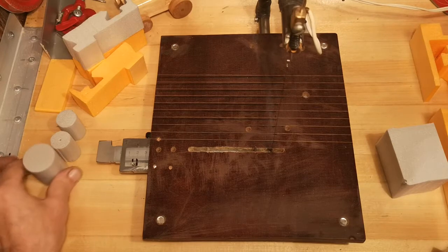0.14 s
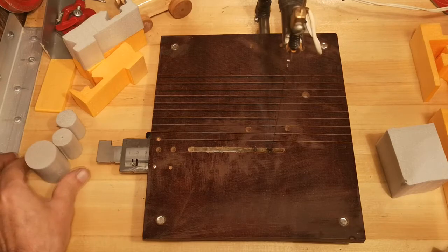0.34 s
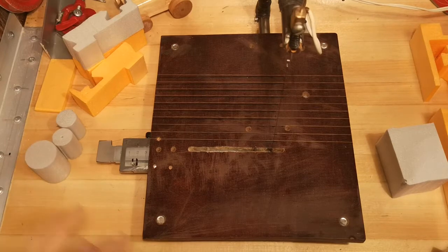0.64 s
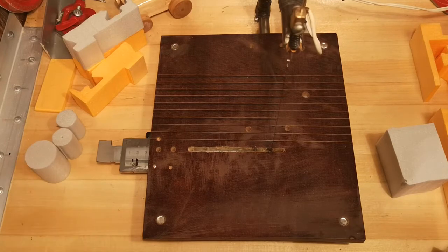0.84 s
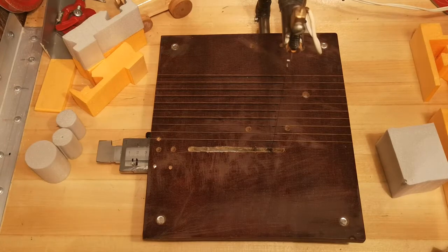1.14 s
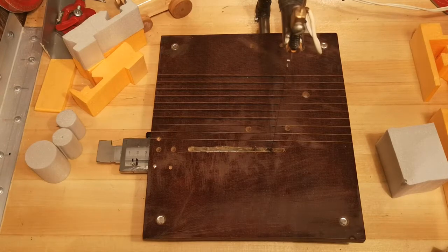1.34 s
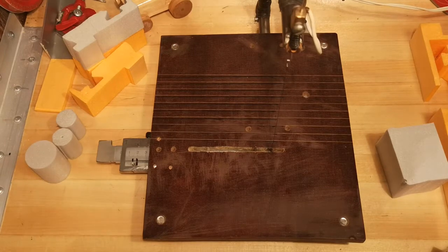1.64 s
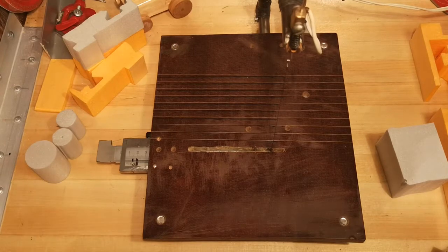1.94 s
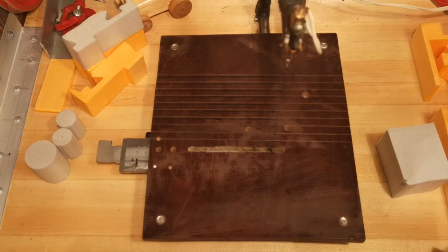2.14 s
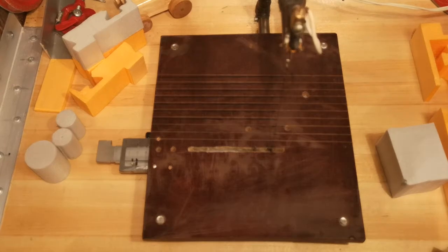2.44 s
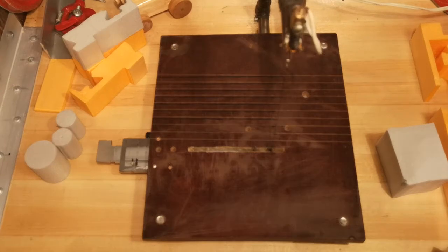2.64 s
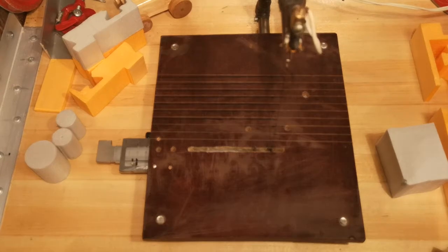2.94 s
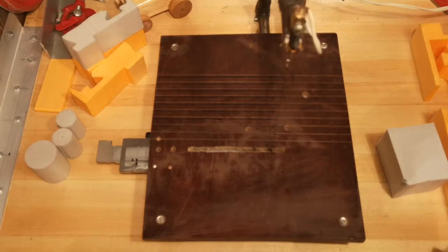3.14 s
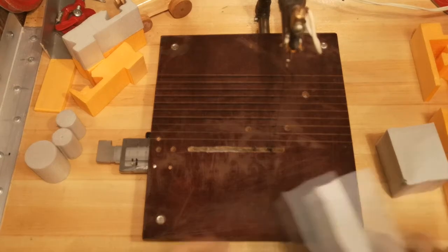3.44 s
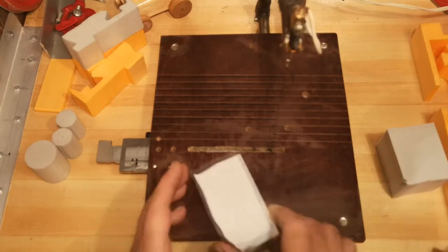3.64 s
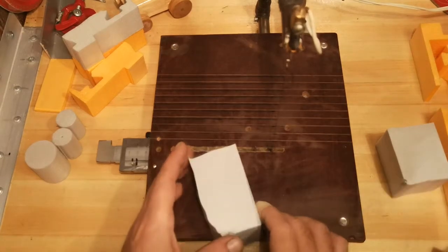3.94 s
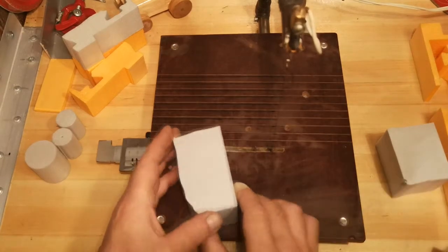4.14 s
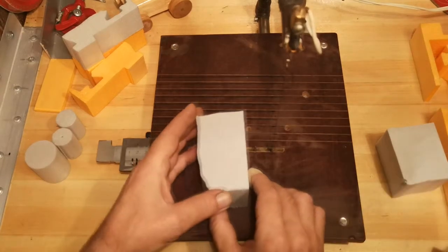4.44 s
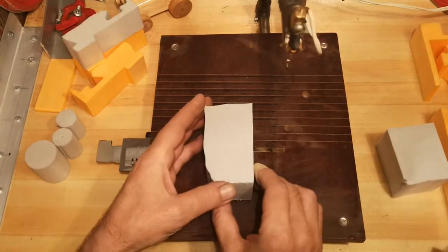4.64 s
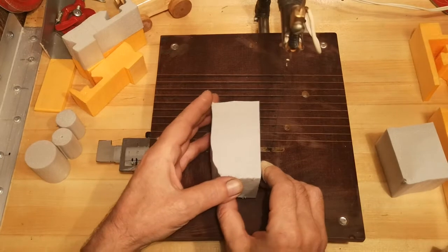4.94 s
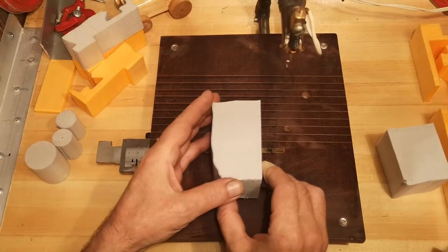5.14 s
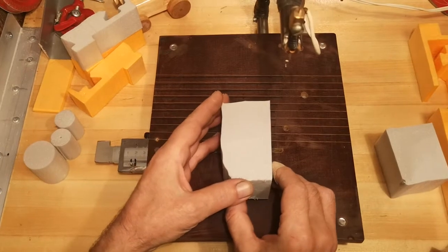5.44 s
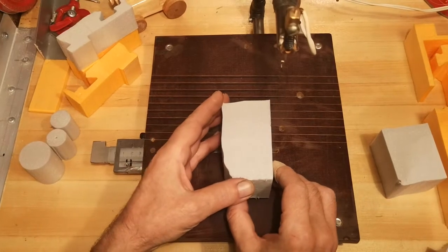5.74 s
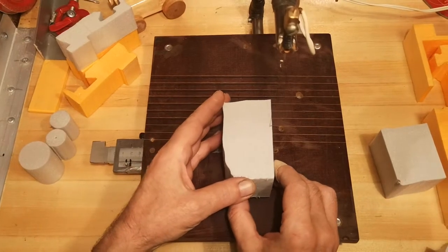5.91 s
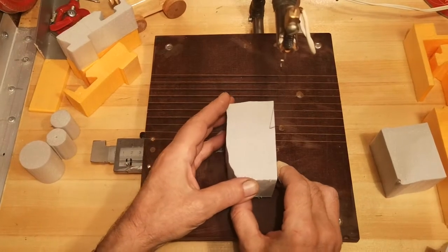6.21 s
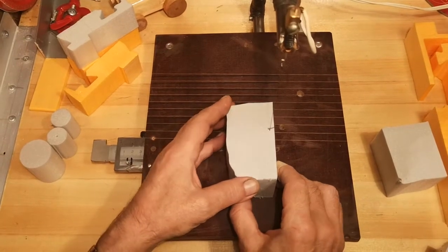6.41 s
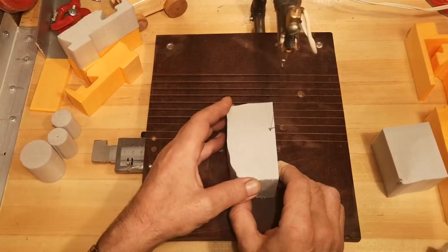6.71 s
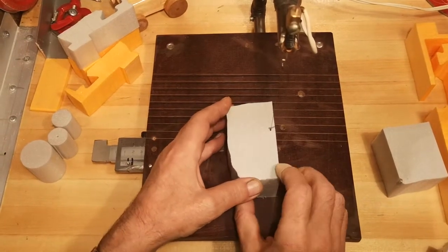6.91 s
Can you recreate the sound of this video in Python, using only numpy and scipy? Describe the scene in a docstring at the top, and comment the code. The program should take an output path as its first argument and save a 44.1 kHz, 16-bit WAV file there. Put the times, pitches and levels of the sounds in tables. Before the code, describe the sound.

A close stereo microphone hears foam handled on a workbench in a small room with very short reflections. Quiet low hum, airy room tone and soft swelling rumble run throughout. From 0 s, dry, hissy finger rubs on polystyrene begin, with a very sharp snap at 0.25 s. Light grainy rubs follow; at 1.06 s a crisp snap carries a tiny metallic clink, with fainter ones at 1.2 and 1.3 s. Around 1.55 s a block scrapes dully with a faint knock, then rubs swell near 1.8 s. Snappy rustles come at 2.45-2.6 s, then little until about 4.1 s. At 4.15-4.3 s a brief gritty scrape squeaks twice around 2 kHz over soft, low board thumps. A thin squeak follows at 4.56 s, another with a scrape at 5.22 s. Sparse bright scratches and small crackles continue, with a clearer snap at 6.6 s, then fade to near quiet by 7 s.

```python
"""Fingers rub polystyrene foam on a workbench: noise grains of bead clicks excite drifting resonances.
A block also scrapes on the board as coloured grain and squeaks as gliding tones of two harmonics.
Foam edges snap as noise bursts through damped resonances; a metal tool and the board ring as decaying modes.
All of these are reverberated by the workshop, over filtered-noise rumble, air, room tone and a hum of sines."""
import sys
import numpy as np
from scipy import signal
from scipy.fft import rfft, irfft, next_fast_len
from scipy.io import wavfile
from scipy.ndimage import uniform_filter1d

SR = 44100
rng = np.random.default_rng(int(sys.argv[2]) if len(sys.argv) > 2 else 0)


def transcribe(u):
    """Save the signal u as a 16-bit wav file named by the first command-line argument.

    u: samples, shape (n,) or (channels, n), limited to [-1, 1]; the rate is SR.
    q: integer samples, one column per channel.
    """
    v = np.clip(np.atleast_2d(u).T, -1, 1)
    q = np.round(v * 32767).astype(np.int16)
    wavfile.write(sys.argv[1], SR, q)


N = 311787
TIME = np.arange(N) / SR


# strokes of the fingers over the foam: start t/s, rise t/s, length t/s, hiss level/dB,
# body re hiss level/dB, fizz re hiss level/dB, left re right level/dB
RUBS = [(0.0, 0.0051, 0.013, -52.5, 3, 0.5, 0.5), (0.062, 0.037, 0.07, -46, 0.5, -4, 0.5),
        (0.18, 0.022, 0.098, -66, 0.5, -8, 4), (0.361, 0.012, 0.049, -67.5, -4, -2, 1),
        (0.409, 0.036, 0.045, -54, 1, 2.5, -1), (0.467, 0.009, 0.068, -69.5, -0.5, 4.5, 0),
        (0.556, 0.026, 0.025, -60, -1, 4.5, -1), (0.703, 0.021, 0.037, -59.5, -4.5, -10, 1),
        (0.769, 0.033, 0.1, -64.5, -5, -6.0, 3), (0.897, 0.032, 0.079, -67, -5, 7, 0),
        (1.02, 0.0078, 0.029, -55.5, -3, 7.5, -2), (1.073, 0.004, 0.065, -62.5, 3.5, -5, 1),
        (1.151, 0.024, 0.072, -55, -1, 5.5, -1), (1.292, 0.075, 0.075, -70.5, 1.5, 6.5, -1.5),
        (1.378, 0.005, 0.022, -62.5, -4.0, 6.5, 0), (1.41, 0.023, 0.12, -70.5, 4.5, -2, 2.0),
        (1.544, 0.019, 0.182, -63, 1, 4.5, 0), (1.713, 0.04, 0.087, -55, 0, -3, -0.5),
        (1.811, 0.065, 0.082, -51.0, -4.5, -5.0, 0), (1.927, 0.0078, 0.139, -57.0, -6.5, -6.5, 0.5),
        (2.137, 0.015, 0.07, -60.5, -1.5, -3.5, 0.5), (2.389, 0.015, 0.028, -60.5, -4, -11.5, 0.5),
        (2.46, 0.011, 0.065, -51.5, -5.5, -7.5, -1.5), (2.523, 0.015, 0.079, -52.5, -6, -5, 2.5),
        (2.781, 0.006, 0.028, -76.5, 1, -3.5, 0), (2.892, 0.014, 0.028, -70.5, -1.5, -3, 0.0),
        (3.024, 0.036, 0.043, -64.0, -2, -3, 0.5), (3.427, 0.041, 0.094, -64.0, -1.5, -1.5, -1.0),
        (3.6, 0.04, 0.09, -79, 2, -1.5, -1.5), (4.143, 0.015, 0.042, -51.5, -0.5, -2.5, 0),
        (4.209, 0.004, 0.062, -52.5, 5.5, -2.5, -1.5), (4.554, 0.0081, 0.019, -50, -9, -3.5, 1.5),
        (4.595, 0.008, 0.032, -60.5, -0.5, -5, -1), (4.746, 0.011, 0.019, -55.5, -8.5, -4, -1),
        (4.908, 0.045, 0.12, -63, -9, -6.5, 1), (5.122, 0.011, 0.08, -63, -5, -9.0, 1),
        (5.222, 0.006, 0.05, -46.5, -8.5, -4.5, 0), (5.353, 0.0086, 0.16, -73.5, -7, -0.5, 0),
        (5.499, 0.006, 0.042, -53.0, -11.5, -5.5, 1.5), (5.634, 0.045, 0.091, -66, -4.5, -2, -1.5),
        (5.811, 0.029, 0.046, -62.0, -12.5, -2.5, 0.5), (5.94, 0.014, 0.028, -63.5, -5.5, -2, -1),
        (6.089, 0.017, 0.098, -54.5, -11, -6, -0.5), (6.193, 0.02, 0.05, -66.5, -6.5, -2.5, 0.0),
        (6.251, 0.008, 0.011, -47.5, -10.5, -11, -0.5), (6.372, 0.068, 0.07, -61.5, -9.5, -1.5, 0.5),
        (6.466, 0.021, 0.059, -70, -16, -4, -2), (6.82, 0.02, 0.055, -79, -6.5, 1, 1),
        (7.03, 0.006, 0.042, -65.5, -5, 0.0, -3)]
# spectra of the bead hiss, of the block under it and of the fine fizz: f/Hz, level/dB
HISS = [(2500, -34.5), (4000, -21.5), (5500, 2), (6500, -4), (7400, 5.5), (8200, 3), (9000, -17.5),
        (10000, -29)]
BODY = [(600, -11), (1000, 3.5), (1600, -3), (2200, 3), (3100, -2.5), (4000, -1), (5500, -15)]
FIZZ = [(7000, -18), (8500, -4), (9400, 2), (10500, -5), (12000, -14), (13500, -12), (15000, -15.5)]
RUB_RELEASE_DB_PER_S = 425


def rubbing():
    """Granular friction: skin slides over beads, giving a hiss, the duller body of the block and a fizz."""
    # each side hears the beads of another face of the block
    faces = np.array([beads(per_s=4600, spread_db=3.0, swell_db=2.5, swell_rate_hz=180) for side in range(2)])
    slips = faces * from_db(4.3 * drift(70))   # the finger pressure trembles
    ringing = changing_grip(slips, shift_db=1.87, shift_rate_hz=20)
    hiss = evened(coloured(ringing, HISS))
    body = evened(coloured(ringing, BODY))
    fizz = evened(coloured(slips, FIZZ))

    out = np.zeros((2, N))
    for start, rise, length, hiss_db, body_db, fizz_db, pan_db in RUBS:
        now = slice(int(max(start, 0) * SR), int((start + length + .5) * SR))
        gain = from_db(hiss_db) * stroke(start, rise, length, RUB_RELEASE_DB_PER_S)[now]
        mix = hiss[:, now] + from_db(body_db) * body[:, now] + from_db(fizz_db) * fizz[:, now]
        out[:, now] += panned(gain * mix, pan_db)
    return workshop(out, wet_db=-4.5, near_t60_s=0.062, far_t60_s=.14, far_db=-21)


def beads(per_s, spread_db, swell_db, swell_rate_hz):
    """Shot noise: beads catch and let go as clicks of uneven size and random sign, in surges of level."""
    sizes = from_db(spread_db * np.minimum(rng.exponential(1, N), 4)) * rng.choice([-1, 1], N)
    happens = rng.random(N) < per_s / SR
    return sizes * happens * from_db(swell_db * drift(swell_rate_hz))


def changing_grip(x, shift_db, shift_rate_hz):
    """Variable damping: the fingers weaken now one resonance of the block, now another."""
    centres = np.geomspace(1500, 10500, num=12)
    relative_width = np.diff(np.log(centres))[0]
    out = 0
    for k, hz in enumerate(centres):
        # neighbours alternate in sign so that they do not cancel between their centres
        out = out + (-1) ** k * resonate(x, hz, relative_width * hz) * from_db(shift_db * drift(shift_rate_hz))
    return out


def evened(x, size=900):
    """Level normalisation: a running rms is held near 1, as by a steady hand, while the grain stays."""
    power = np.abs(uniform_filter1d(np.mean(x ** 2, axis=0), size=size))
    return x / np.sqrt(power + 1e-9)


# drags of a block over the board: start t/s, rise t/s, length t/s, level/dB
DRAGS = [(1.54, 0.0037, 0.017, -53.5), (1.567, .01, 0.055, -62.5), (1.617, .03, .18, -63.5),
         (1.8, .03, .2, -71), (4.15, .012, 0.021, -49), (4.21, .02, 0.083, -49), (5.215, 0.023, .055, -57)]
# spectrum of the scrape: f/Hz, level/dB
DRAG = [(300, -15.5), (450, 1), (600, 1), (950, 4.5), (1500, -4.5), (2500, -8), (5000, -60)]
DRAG_RELEASE_DB_PER_S = 382


def dragging():
    """Friction under load: foam pressed on the board scrapes with a duller, denser grain."""
    faces = np.array([beads(per_s=6000, spread_db=1.5, swell_db=1.5, swell_rate_hz=140) for side in range(2)])
    gain = np.zeros(N)
    for start, rise, length, level_db in DRAGS:
        gain += from_db(level_db) * stroke(start, rise, length, DRAG_RELEASE_DB_PER_S)
    return workshop(gain * coloured(faces, DRAG), wet_db=1.0, near_t60_s=0.03, far_t60_s=0.14, far_db=-25)


# stick-slip squeaks: start t/s, length t/s, first f/Hz, last f/Hz, level/dB, octave re fundamental level/dB
SQUEAKS = [(4.157, 0.035, 2045, 1940, -48, -26), (4.218, 0.035, 2040, 1930, -45.5, -14),
           (4.25, 0.06, 1995, 1945, -43.5, -24), (4.222, 0.016, 3930, 3900, -47, -18),
           (4.268, 0.02, 3330, 3000, -49, -14), (4.255, 0.044, 870, 860, -55, -20),
           (4.565, 0.078, 1645, 1665, -56.5, -8), (4.559, 0.018, 5000, 5100, -52.5, -7),
           (5.22, 0.023, 3360, 3140, -49, -6)]


def squeaks(jitter=.013, flutter_db=3.2, wet_db=0):
    """Stick-slip oscillation: slips lock into a short, unsteady tone and its octave, gliding in pitch."""
    out = np.zeros((2, N))
    wander, flutter = drift(1100), from_db(flutter_db * drift(170))
    for s, length, first_hz, last_hz, level_db, octave_db in SQUEAKS:
        u = np.linspace(0, 1, int(length * SR))
        now = slice(int(s * SR), int(s * SR) + len(u))
        pitch_hz = (first_hz + (last_hz - first_hz) * u) * (1 + jitter * wander[now])
        phase = 2 * np.pi * np.cumsum(pitch_hz) / SR
        tone = np.sin(phase) + from_db(octave_db) * np.sin(2 * phase)
        envelope = np.sqrt(np.abs(np.sin(np.pi * u)))
        out[:, now] += from_db(level_db) * envelope * flutter[now] * tone
    return workshop(out, wet_db)


# foam snaps and taps: t/s, level before an 8 dB lift/dB, tilt level per octave/dB,
# crush decay by 60 dB t/s, left re right level/dB
SNAPS = [(0.015, -41, -2, 0.01, -6), (0.09, -22, -1.5, 0.031, -1), (0.15, -26, -2, 0.035, 1),
         (.2468, -5.5, 1.5, 0.0037, -0.5), (0.2494, -14.5, -3, 0.0026, 2), (0.438, -28, 4, 0.049, -1),
         (1.057, -15.5, -2.5, 0.041, -1), (1.2148, -22, 1, 0.02, 1), (1.2825, -33.5, 1, 0.0043, 4),
         (1.468, -28.5, -1.5, 0.032, 1.5), (1.936, -32, 3, 0.018, -4), (2.601, -23, 2, 0.041, -4),
         (4.147, -34.5, 6, 0.01, -10), (4.159, -23.5, -13, 0.028, -8), (4.214, -25, -8.5, 0.024, 4),
         (4.252, -30, -2, 0.017, 1), (4.264, -26.5, -5.5, 0.012, 5), (5.137, -37, 3, 0.03, -3),
         (5.227, -37, 1.5, .02, -4), (5.278, -25.5, 10, .015, -2), (5.519, -31, 3, 0.054, -10),
         (6.107, -34.5, 7, .025, 1), (6.16, -34.5, 4, .035, -2), (6.2575, -30, 4, .012, 2),
         (6.268, -30, 2, .02, 2), (6.534, -45, 5, .005, 0), (6.591, -33.5, -11, 0.078, 1),
         (6.6, -25.5, 5, 0.026, -1)]
# resonances of the foam: f/Hz, bandwidth f/Hz, level/dB
FOAM = [(1533, 1000, -7.5), (2530, 430, -1), (4650, 3700, -6.5), (7500, 1110, 2), (9300, 820, -0.5),
        (14500, 2500, -22.5)]


def snaps(lowest_hz=1000, rise_s=0.00025):
    """Impulsive release: a foam edge lets go and a burst of crushing beads rings the damped block."""
    out, t = np.zeros((2, N)), np.arange(SR // 20) / SR
    for s, level_db, tilt_db, crush_t60_s, pan_db in SNAPS:
        envelope = from_db(-60 * t / crush_t60_s) * (1 - np.exp(-t / rise_s))
        crush = rng.standard_normal((2, len(t))) * envelope
        snap = np.zeros_like(crush)
        for k, (hz, width_hz, mode_db) in enumerate(FOAM):
            gain = (-1) ** k * from_db(mode_db + tilt_db * np.log2(hz))
            snap += gain * resonate(crush, hz, width_hz)
        # a small light block radiates little bass
        snap = signal.lfilter(*signal.butter(2, lowest_hz, "high", fs=SR), snap)
        snap /= np.linalg.norm(snap, axis=1, keepdims=True)   # equal energy on each side
        add(out, s, panned(from_db(level_db + 8) * snap, pan_db))
    return workshop(out, wet_db=-1.5, near_t60_s=0.077, far_t60_s=0.15, far_db=-16)


# clinks of a metal tool: t/s, level/dB, most excited f/Hz, left re right level/dB
CLINKS = [(1.0588, -20.5, 8400, -1.5), (1.2148, -30, 5400, 3), (1.2825, -35.5, 12900, -8)]
# modes of the tool: f/Hz, level/dB, decay by 60 dB t/s
TOOL = [(2500, -7.5, 0.059), (4610, -5, 0.06), (5940, -4, 0.034), (6083, -11.5, 0.084), (8760, 0, 0.028),
        (8810, -0.5, .035), (9120, -2.5, 0.0151), (10560, -21.5, 0.0496), (12950, -10.5, .03)]


def tool_clinks():
    """Modal ringing of struck metal, each contact favouring a narrow range of modes."""
    return blows(CLINKS, TOOL, reach_octaves=0.4, wet_db=1.5)


# knocks on the board: t/s, level/dB, most excited f/Hz, left re right level/dB
KNOCKS = [(1.5505, -40, 1250, 2), (4.159, -42, 150, 0), (4.215, -40, 704, -4.5), (4.254, -35.5, 293, -2),
          (4.272, -28.5, 123, 0), (4.295, -31, 121, 5), (4.313, -36.5, 170, -3), (5.227, -48.5, 499, 1),
          (5.247, -43, 600, -1)]
# modes of the board: f/Hz, level/dB, decay by 60 dB t/s
BOARD = [(119, -1.5, 0.14), (191.6, -4.5, 0.12), (255.6, -4, 0.13), (342, -2, 0.077), (367, -14, 0.13),
         (590, -4, 0.11), (787, -6.5, 0.048), (934, -1, 0.097), (1226, -4.5, 0.03), (1750, -3, 0.029)]


def board_knocks():
    """Modal ringing of a struck plate, each contact favouring a broad range of modes."""
    return blows(KNOCKS, BOARD, reach_octaves=1.0, wet_db=3.0)


def blows(hits, modes, reach_octaves, wet_db):
    """Modal superposition: a blow rings all modes, most of all those near the pitch its contact favours."""
    out, t = np.zeros((2, N)), np.arange(SR // 2) / SR
    hz, mode_db, t60_s = np.transpose(modes)[:, :, None]
    for s, level_db, favoured_hz, pan_db in hits:
        octaves_away = np.log2(hz / favoured_hz)
        strength = from_db(level_db + mode_db) / (1 + (octaves_away / reach_octaves) ** 2)
        signs = rng.choice([-1, 1], hz.shape)
        rings = strength * signs * np.sin(2 * np.pi * hz * t) * from_db(-60 * t / t60_s)
        add(out, s, panned(rings.sum(axis=0), pan_db))
    return workshop(out, wet_db)


# swells of the rumble: start t/s, rise t/s, length t/s, deep rumble level/dB, rumble level/dB
SWELLS = [(0.419, 0.063, 0.16, -52.5, -49), (0.726, 0.053, 0.12, -61, -46),
          (0.874, 0.083, 0.33, -42.5, -44.5), (1.192, 0.49, 0.84, -40.5, -44),
          (2.102, .05, 0.13, -47, -48.5), (2.453, 0.088, 0.1, -39.5, -39.5), (5.49, 0.071, 0.12, -46, -43),
          (5.761, 0.12, 0.22, -47, -38), (6.027, .15, 0.32, -43.5, -43.5)]
SWELL_RELEASE_DB_PER_S = 110
DEEP_DB, RUMBLE_DB = -52, -51   # between the swells
# spectra of the deep rumble, the rumble, the air and the room tone: f/Hz, level/dB
DEEP = [(12, -11.5), (20, -5.5), (30, 0), (42, -5.5), (60, -30)]
RUMBLE = [(30, -23), (48, -4), (62, 3.5), (82, -5.5), (100, -6.5), (120, -16.5), (150, -35.5)]
AIR = [(200, -5.5), (450, 0.5), (700, -1), (1100, 0.5), (2000, -5.5), (4000, -19.5), (9000, -19)]
ROOM_TONE = [(100, -2), (150, -0.5), (195, -1), (270, -2), (330, -9.5), (400, -10), (550, -26), (2000, -24),
             (4000, -31), (9000, -35), (11500, -40), (15500, -40.5)]
ROOM_TONE_DB = -64.5
# course of the air noise: t/s, level/dB
AIR_DB = [(0, -75.5), (3.9, -76.5), (5.1, -74), (5.7, -68.5), (6.3, -69.5), (7.07, -74)]
# partials of the mains hum: f/Hz, level/dB
HUM = [(99.7, -57), (199.4, -78.5)]


def background():
    """Incoherent sources add in power: swelling rumble, mains hum, air of varying level, steady room tone."""
    deep, rumble = from_db(DEEP_DB), from_db(RUMBLE_DB)
    for start, rise, length, deep_db, rumble_db in SWELLS:
        swell = stroke(start, rise, length, SWELL_RELEASE_DB_PER_S)
        deep = np.hypot(deep, from_db(deep_db) * swell)
        rumble = np.hypot(rumble, from_db(rumble_db) * swell)
    low = deep * stereo_noise(DEEP) + rumble * stereo_noise(RUMBLE)
    air = from_db(np.interp(TIME, *np.transpose(AIR_DB))) * stereo_noise(AIR)
    hum = sum(from_db(db) * rms_one(np.sin(2 * np.pi * hz * TIME)) for hz, db in HUM)
    return low + air + hum + from_db(ROOM_TONE_DB) * stereo_noise(ROOM_TONE)


# stereo width of the background noise: f/Hz, side re mid level/dB
WIDTH = [(60, -26), (110, -16), (200, -8), (380, -4), (700, 5), (1290, -4), (2380, 2), (4400, 0.5),
         (8120, 0.5), (15000, 1)]


def stereo_noise(spectrum):
    """Interaural coherence of diffuse noise: alike on both sides in the bass, wide higher up."""
    mid, side = rng.standard_normal((2, N))
    side = shaped(side, WIDTH)
    return coloured(mid + side * [[1], [-1]], spectrum)


def workshop(x, wet_db, near_t60_s=0.057, far_t60_s=.18, far_db=-12):
    """Reverberation: direct sound, dense reflections off the cluttered bench, a weaker tail from the walls."""
    t = np.arange(SR // 4) / SR
    near = from_db(-60 * t / near_t60_s)
    far = from_db(far_db - 60 * t / far_t60_s)
    decay = (near + far) * (t > .0007)   # the reflections arrive after the direct sound
    echoes = rfft(rng.standard_normal((2, len(t))) * decay, 2 * len(t))
    # the reflections carry equal energy in every broad band
    echoes = irfft(echoes / np.sqrt(uniform_filter1d(np.abs(echoes) ** 2, size=400)))[:, :len(t)]
    wet = from_db(wet_db)
    reflected = signal.oaconvolve(np.atleast_2d(x), echoes, axes=1)[:, :N]
    return (x + wet * reflected) / np.hypot(1, wet)


def stroke(start_s, rise_s, length_s, release_db_per_s):
    """Envelope of one movement: linear rise, hold until its length is over, exponential decay."""
    t = TIME - start_s
    rise = np.clip(t / max(rise_s, 1 / SR), 0, 1)
    return rise * from_db(-np.clip(release_db_per_s * (t - length_s), 0, 200))


def resonate(x, hz, width_hz):
    """Damped resonance: a two-pole band-pass with a gain of about 1 at its top."""
    r = np.exp(-np.pi * width_hz / SR)
    zeros = np.array([1, 0, -1]) * (1 - r * r) / 2
    poles = [1, -2 * r * np.cos(2 * np.pi * hz / SR), r * r]
    return signal.lfilter(zeros, poles, x)


def shaped(x, spectrum, skirt_power=0):
    """Linear filtering: weight each frequency by a spectrum, with optional skirts beyond its ends."""
    hz, level_db = np.transpose(spectrum)
    size = next_fast_len(N)
    f = np.maximum(np.arange(size // 2 + 1) * SR / size, 1)
    skirts = np.minimum(1, np.minimum(f / hz[0], hz[-1] / f)) ** skirt_power
    gain = skirts * from_db(np.interp(np.log(f), np.log(hz), level_db))
    return irfft(rfft(x, size) * gain, size)[..., :N]


def coloured(x, spectrum):
    """Spectral colour: a spectrum that falls away beyond its ends, at rms 1."""
    return rms_one(shaped(x, spectrum, skirt_power=4))


def drift(rate_hz):
    """Random modulation: straight lines between random knots, at rms 1."""
    knots = rng.standard_normal(int(N / SR * rate_hz) + 2)
    return rms_one(np.interp(TIME * rate_hz, np.arange(len(knots)), knots))


def panned(x, pan_db):
    """Level-difference panning: share a sound between left and right at constant power."""
    gains = from_db(np.array([[.5], [-.5]]) * pan_db)
    return x * gains / np.sqrt(np.mean(gains ** 2, axis=0))


def add(out, s, sound):
    """Superposition: mix a short stereo sound in at time s."""
    i = max(round(s * SR), 0)
    out[:, i:i + sound.shape[1]] += sound[:, :N - i]


def from_db(db):
    """Level to amplitude: decibels to gain."""
    return 10 ** (np.asarray(db) / 20)


def rms_one(x):
    """Power normalisation: scale to rms 1."""
    return x / np.sqrt(np.mean(x ** 2) + 1e-20)


def scene():
    """Superposition of everything that sounds at the bench and around it."""
    foam = rubbing() + dragging() + squeaks() + snaps()
    return foam + tool_clinks() + board_knocks() + background()


def record(dry):
    """Band limitation: a steep elliptic low-pass cuts the top."""
    lowpass = signal.ellip(10, .2, 80, 15500, fs=SR, output="sos")   # order, ripple/dB, stop/dB, f/Hz
    return signal.sosfilt(lowpass, dry)


dry = scene()
out = record(dry)
transcribe(out)
```